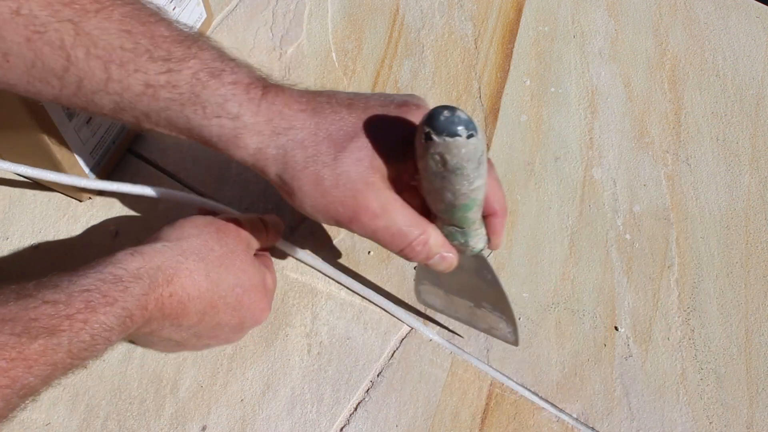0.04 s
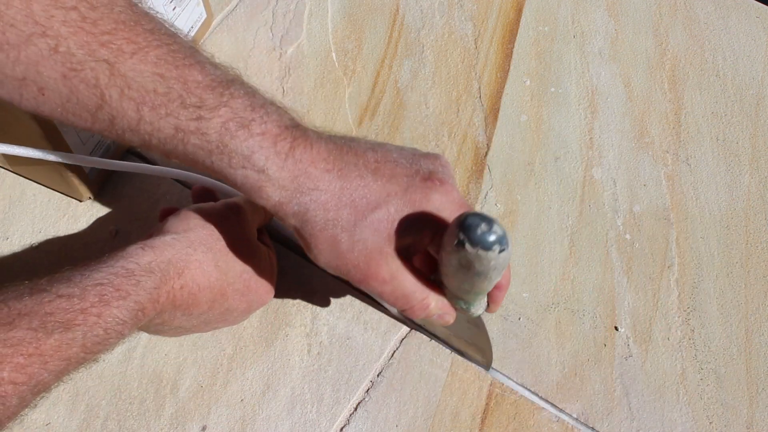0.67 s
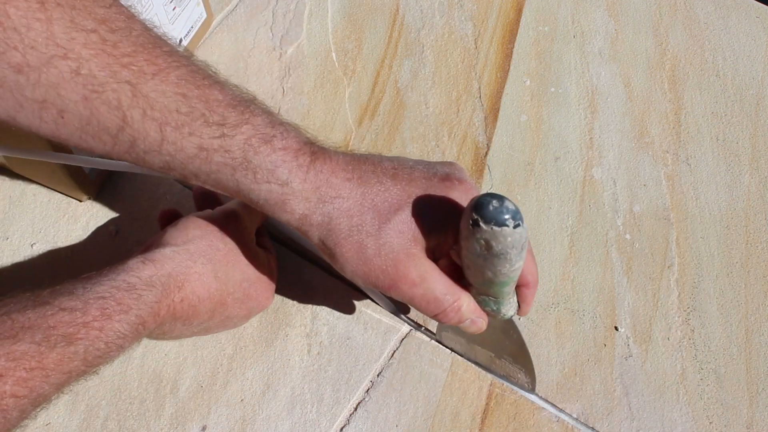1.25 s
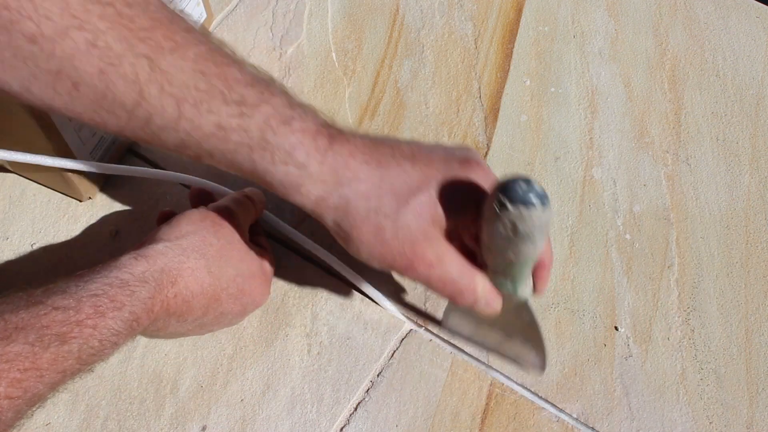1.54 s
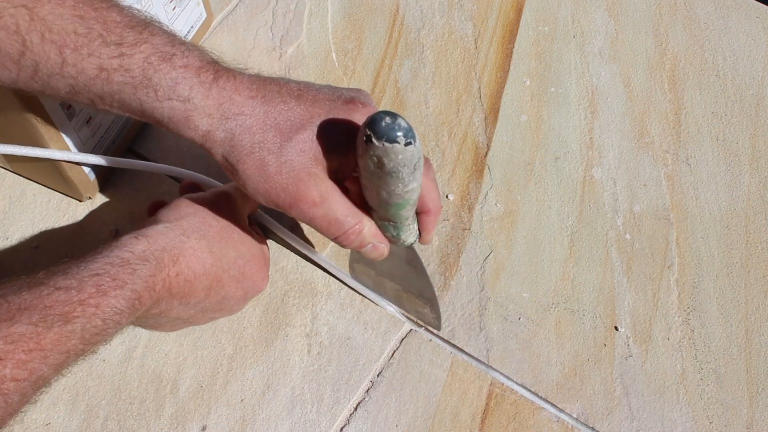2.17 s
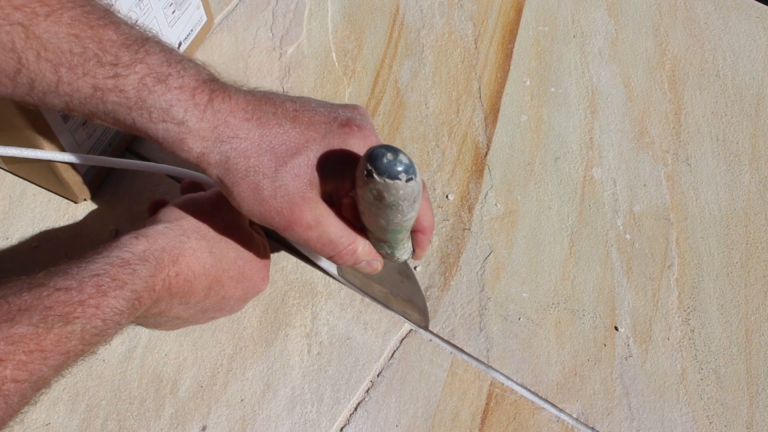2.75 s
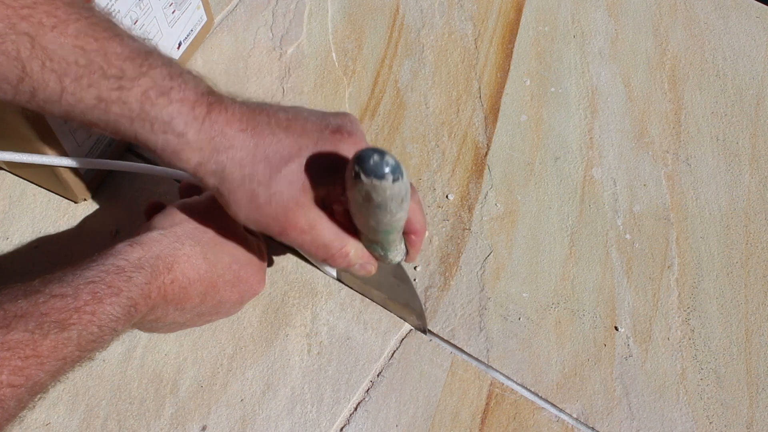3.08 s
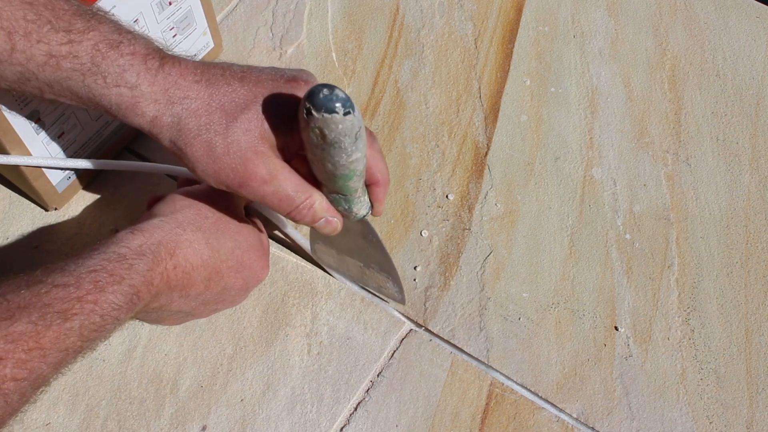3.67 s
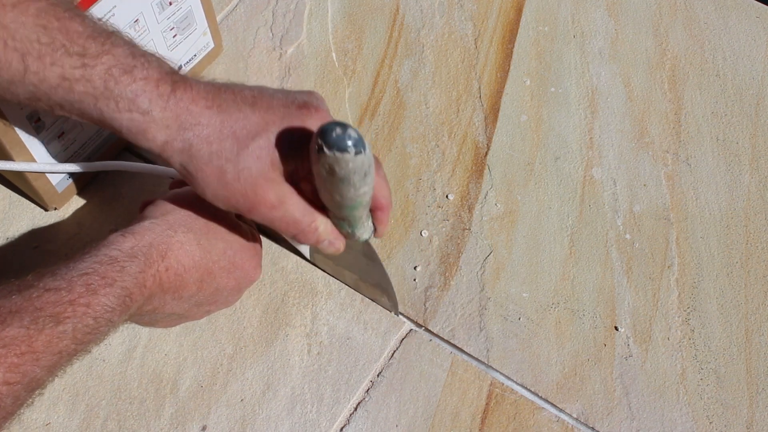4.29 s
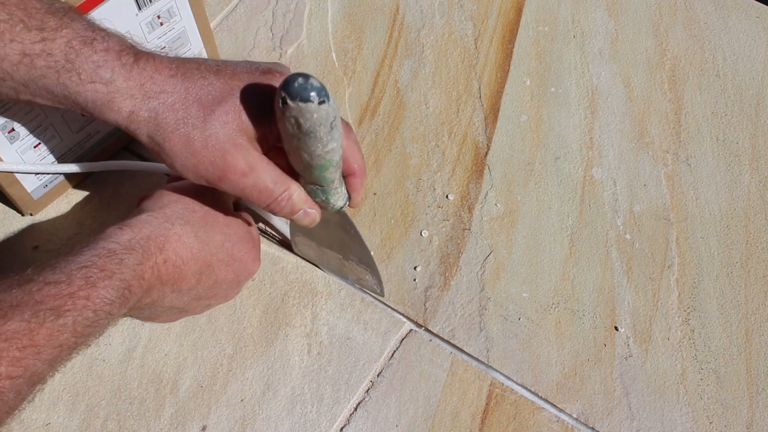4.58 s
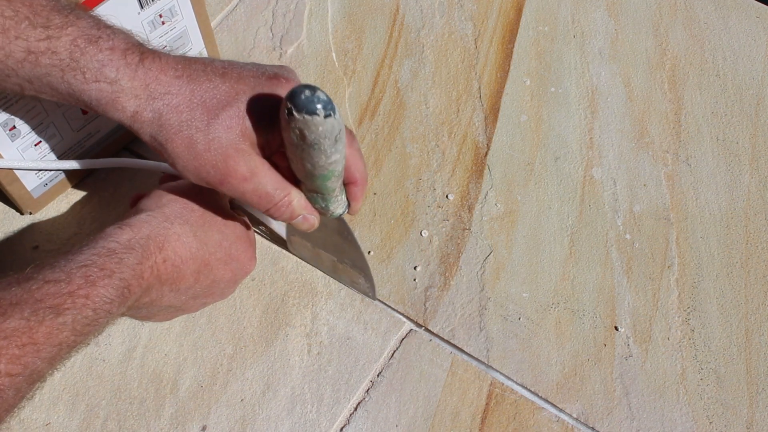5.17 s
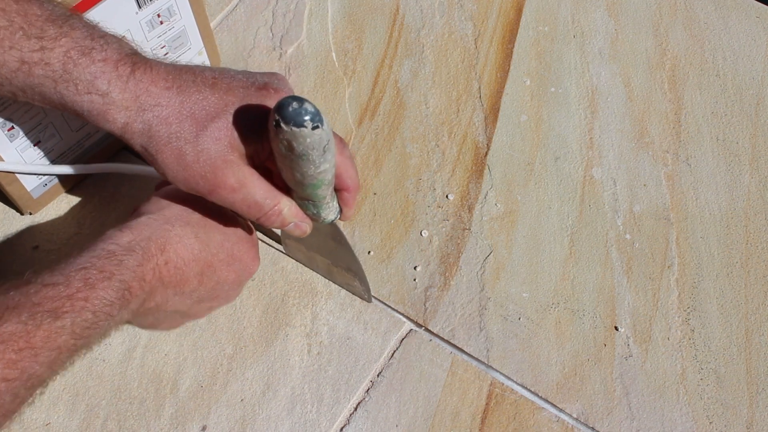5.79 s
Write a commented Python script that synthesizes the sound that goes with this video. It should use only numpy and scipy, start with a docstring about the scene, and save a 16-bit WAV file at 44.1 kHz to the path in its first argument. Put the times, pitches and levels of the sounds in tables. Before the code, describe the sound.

Outdoors, distant traffic rumbles steadily under a soft tyre wash that eases over the first two seconds. A dove gives one rolling coo at the start. From 0.6 seconds, close by, a steel scraper works foam rod into a paving joint with short gritty scrapes and light clicks. Sharper clicks with a brief metallic ring come at about 1.0 and 1.6 seconds, followed by softer rubbing. A far bird whistles very faintly around 1.1 seconds and several times between 2.5 and 3.9. A busy run of clicks, scrapes and slight foam creaks fills 3.0 to 3.7 seconds, and another, with a bright ping, comes from 4.2 to 4.7. The dove coos six times, short and long, from 3.7 to 5.6 seconds. After a click at 5.3, the tool knocks hard on the slab at 5.8, the loudest sound, followed by a small ringing click.

```python
"""Outdoors on sandstone paving, close by, a steel scraper presses foam rod into a joint between slabs.
The blade rubs over grit, clicks against the stone edges, rings as it springs free and knocks once, hard.
A dove coos, its fluttering throat chopping the tone into a roll. A far bird whistles thinly,
and distant traffic rumbles under a wash of tyre noise."""
import sys
import numpy as np
from scipy import signal
from scipy.fft import rfft, irfft
from scipy.io import wavfile
from scipy.ndimage import uniform_filter1d

SR = 44100
rng = np.random.default_rng(int(sys.argv[2]) if len(sys.argv) > 2 else 0)


def bounce(signal):
    """Save signal as a 16-bit WAV file at the path given by the first command-line argument."""
    frames = np.transpose(np.atleast_2d(signal))
    limited = np.clip(frames, -1, 1)
    pcm = np.round(limited * 32767).astype(np.int16)
    wavfile.write(sys.argv[1], SR, pcm)


N = 266408
T = np.arange(N) / SR

# scraper strokes along the joint: peak_s, length_s, level_db, foam_db (added to level_db), singing_hz
STROKES = [(.629, 0.013, -48.5, -23, 7600), (0.673, .005, -45, -20, 11500),
           (0.798, 0.083, -39.5, -12.5, 1290), (0.828, 0.019, -32.5, -13, 4240),
           (.886, .06, -44, -13.5, 4020), (0.929, 0.019, -45.5, -10, 10000), (1.002, .03, -45, -24, 7100),
           (1.026, 0.033, -30, -30, 7200), (1.502, 0.052, -50.5, -8.5, 8100),
           (1.654, .016, -31.5, -25, 7450), (2.084, 0.074, -52, -13, 4100),
           (2.196, 0.044, -49, -11.5, 4460), (2.377, 0.12, -48, -11, 9100),
           (2.582, 0.021, -45.5, -12, 3870), (2.993, 0.081, -53.5, 6, 5640), (3.102, 0.033, -42, -11, 9250),
           (3.161, 0.0098, -46.5, -10.5, 6400), (3.248, .036, -32.5, -26, 6500),
           (3.308, .044, -36, -13.5, 940), (3.358, 0.036, -43.5, -10.5, 10800),
           (3.436, .022, -37.5, 6.5, 1720), (3.476, 0.025, -37.5, 2.5, 2430), (3.703, 0.16, -53, -11, 7900),
           (4.266, 0.061, -39, -11, 9650), (4.431, 0.046, -36.5, -11.5, 9400), (4.609, 0.078, -49, 4, 5500),
           (4.89, 0.017, -50, -9.5, 6000), (5.89, 0.064, -52, -12, 3500), (5.994, 0.044, -46.5, 1, 2270)]
# the tones the steel blade rings with: pitch_hz, level_db, ring_s (time to fade by 60 dB)
BLADE_TONES = [(942, -8, .1), (1906, -1, .1), (2299, -14, .17), (3090, -6, .07), (3768, -9, .22),
               (4339, -16, .13), (5461, 0, .11), (7009, -7, .11), (7250, -10, .06), (7455, -5, .11),
               (8382, -11, .07), (9238, -13, .07), (10260, -7, .07), (11910, -14, .06), (12920, -14, .07),
               (14200, -18, .06)]


def rubs(steel_db=-9, singing_db=8, push_share=0.43):
    """Steel drags over sand; each stroke makes another part of the blade sing; squeezed foam creaks."""
    # tone colour of the sand: pitch_hz, level_db
    grit_colour = [(500, -25.5), (900, 10), (1400, -3), (2100, 3), (3200, 3), (4300, 3.5), (6500, 8),
                   (8800, 11), (11000, 12.5), (13000, 0), (16000, -52)]
    # tone colour of the foam: pitch_hz, level_db
    foam_colour = [(70, -11), (160, 8.5), (330, -6), (500, -7), (750, -17), (1500, 5.5), (3000, -23),
                   (5000, -3)]
    out = np.zeros(N)
    t = np.linspace(-.2, .2, int(.4 * SR))
    # pressed into the joint, the blade rings only briefly
    pressed = ring([(hz, db, .15 * ring_s) for hz, db, ring_s in BLADE_TONES], 0, count=2000)
    for peak_s, length_s, db, foam_db, singing_hz in STROKES:
        rise_s, fall_s = length_s * push_share, length_s * (1 - push_share)
        pressure = np.exp(-np.abs(t / np.where(t < 0, rise_s, fall_s)) ** 1.18)
        judder = undb(3 * wobble(len(t), 180))
        sand = grains(len(t), 4.2) * judder
        # the more foam under the edge, the duller the grit
        dull_db = 3.42 * max(foam_db + 14.5, 0)
        dulled = [(hz, grit_db - dull_db * max(np.log2(hz / 4000), 0)) for hz, grit_db in grit_colour]
        steel = unit(signal.fftconvolve(sand, pressed)[:len(t)])
        grit = unit(colour(sand, dulled)) + undb(steel_db - dull_db) * steel
        singing = signal.lfilter(*signal.iirpeak(singing_hz, 4, fs=SR), grit)
        singing *= np.sqrt(3000 / singing_hz)  # the blade's low tones stand out most
        scrape = unit(grit + undb(singing_db) * singing)
        foam = unit(colour(grains(len(t), 5.8) * judder, foam_colour))
        add(out, peak_s + t[0], undb(db) * pressure * (scrape + undb(foam_db) * foam))
    return pan(out, 2.1)


def clicks():
    """The blade catches on stone: a square hit snaps and thumps the slab, a glancing one skids."""
    # blade meeting stone: start_s, level_db, squareness (0 glancing, 1 head-on), clack_hz
    hits = [(0.7461, -38.5, 0.3, 1090), (0.7952, -36.5, 0.11, 7560), (0.8224, -35.5, 0.23, 2200),
            (1.034, -21, 0, 7200), (1.038, -23.5, 0.079, 7300), (1.639, -24.5, 0.24, 7300),
            (1.6596, -26.5, .3, 2880), (2.0956, -32.5, 0.75, 9700), (2.3354, -38.5, 0.68, 9650),
            (2.3834, -33, 0.61, 10100), (3.065, -36, 0.48, 1100), (3.095, -35.5, 0.29, 3160),
            (3.2133, -35.5, .15, 6470), (3.2367, -27.5, 0.032, 5350), (3.244, -22.5, 0, 12900),
            (3.2742, -32.5, 0.39, 13000), (3.284, -27.5, 0.1, 10100), (3.3171, -27.5, .25, 5600),
            (3.342, -34, 0.69, 3130), (3.356, -41, 0.73, 3120), (3.4195, -41.5, 1, 1110),
            (3.4269, -37.5, 0.93, 1400), (3.4334, -28.5, 0.84, 1900), (3.4624, -33, 0.91, 1900),
            (3.4891, -28.5, 0.72, 4160), (3.51, -36, 0.92, 4400), (3.55, -31, 0.75, 2950),
            (3.607, -39, 0.81, 10100), (3.6408, -36, 0.28, 7300), (3.6815, -42, 0.23, 12000),
            (4.2344, -32, 0, 10000), (4.2845, -26.5, 0.2, 12600), (4.4078, -24, 0.31, 3170),
            (4.4374, -22, 0.13, 7250), (4.4476, -20.5, 0.28, 10300), (4.524, -27, 0.81, 1360),
            (4.602, -33.5, 0.3, 5400), (4.622, -36, 0.9, 10000), (4.681, -40.5, 0.74, 1860),
            (5.275, -35.5, 0.66, 3130), (5.307, -24.5, 0.52, 8950), (5.909, -39, 0.65, 1220),
            (5.9742, -29, 0.46, 1040)]
    # tone colours of a click's four parts, low to high: pitch_hz, level_db
    thump = [(80, -16.5), (200, -9.5), (380, -4), (520, -5.5), (800, -17.5), (1200, -13), (2500, -17.5)]
    middle = [(400, -63), (950, 8.5), (1900, 5), (3200, 1.5), (4800, -1.5)]
    treble = [(1800, -21.5), (3700, 7.5), (5500, 11), (7300, 9.5), (8800, 8.5), (11500, -19)]
    top = [(6000, -35), (9300, 0), (10500, 0), (12800, -2), (14000, -9), (16000, -12)]
    out = np.zeros((2, N))
    for start_s, db, square, clack_hz in hits + stray_grains():
        # each pair given to between() is (glancing, square)
        slip_s = between((0.0032, 0.00076), square)
        rise_s = .0001 + 0.0013 * (1 - square) ** 2
        snap = 1.5 * square
        click = undb(between((-31, 8), square)) * crunch(thump, 0.0052, 0.89)
        click += undb(between((-18, -1), square)) * crunch(middle, slip_s, 1.5 * snap, rise_s)
        click += undb(-3.5) * crunch(treble, slip_s, snap, rise_s)
        click += undb(between((-2.5, -15.5), square)) * crunch(top, slip_s, 0.3 * snap, rise_s)
        # each contact point clacks at its own pitch
        clack = [(clack_hz / np.sqrt(2), -9), (clack_hz, 0), (clack_hz * np.sqrt(2), -9)]
        click += undb(-5) * crunch(clack, slip_s, snap, rise_s)
        add(out, start_s - 0.0006 * (1 - square), pan(click * undb(db), between((1.5, 5.5), square)))
    return out


def stray_grains(count=2, firm_db=-45, squareness=.3):
    """List extra clicks: firm strokes catch stray grains, hardest near peak pressure; light ones glide."""
    chance = rng.standard_normal((len(STROKES), count, 2))
    hits = []
    for (peak_s, length_s, db, _, hz), draws in zip(STROKES, chance):
        if db > firm_db:
            for offset, size in draws:
                grain_db = db - 3 - 8 * abs(offset) + 2 * size
                hits.append((peak_s + length_s * offset / 2, grain_db, squareness, hz))
    return hits


def blade():
    """The thin steel rings once the joint no longer holds it; the contact point favours some tones."""
    # blade springing free: start_s, level_db, tilt_db (per octave), favoured_hz, boost_db
    releases = [(1.039, -26, .3, 5461, 3), (1.640, -37, 2, 7300, 7), (1.659, -28.5, -1.2, 7455, 3),
                (3.247, -40, 2, 12920, 4), (4.448, -31, 2, 12920, 13), (5.974, -29.5, -2, 3770, 15)]
    out = np.zeros(N)
    for start_s, db, tilt_db, favoured_hz, boost_db in releases:
        tones = [(hz, tone_db + boost_db * np.exp(-(np.log2(hz / favoured_hz) / 0.05) ** 2), ring_s)
                 for hz, tone_db, ring_s in BLADE_TONES]
        add(out, start_s, undb(db) * ring(tones, tilt_db))
    return pan(out, 1.2)


def knock(start_s=5.837):
    """The tool butts hard on the slab, its handle rings, and the paving throws the crack back."""
    # tone colour of the crack: pitch_hz, level_db
    crack_colour = [(150, -28), (250, -9), (350, 0.5), (500, -6), (700, 0), (1100, -4), (1800, 0),
                    (2300, -8), (4000, -7), (4900, -15), (6500, -26), (11000, -21.5), (16000, -41)]
    # the tones the handle rings with: pitch_hz, level_db, ring_s
    handle_tones = [(353, -17, 0.062), (800, -13, 0.12), (892, 13, 0.049), (1890, 4, 0.036),
                    (2730, -17, 0.033), (5280, 3, 0.034), (6370, -6, 0.075), (7060, -5, 0.067),
                    (8420, -11, .09)]
    out = np.zeros(N)
    crack = crunch(crack_colour, .0025, 1.8)
    add(out, start_s, undb(-14.0) * crack)
    add(out, start_s + 0.0006, undb(-22.5) * ring(handle_tones, 0))
    add(out, start_s + 0.0029, undb(-23.5) * crack)
    return pan(out, 2.0)


def dove(roll_hz=67, bend_hz=30, waver_hz=52, lowest_hz=518):
    """An almost pure tone climbs and sags; a flutter in the throat chops it into uneven pulses."""
    # coos: start_s, length_s, climb_s, peak_hz, level_db, roll_before and roll_after the peak (0 to 1)
    coos = [(.035, .497, 0.33, 711.3, -35.5, 0.8, 0), (3.733, 0.071, 0.045, 686, -36.5, 0.5, 0.3),
            (3.938, 0.11, 0.076, 648.5, -36.5, 0.49, 0.9), (4.152, 0.53, 0.33, 715, -35.5, 0.81, .1),
            (4.754, 0.087, 0.034, 693, -42.5, 0.1, 0.13), (4.94, .148, 0.084, 760, -38.5, 0.4, 0.5),
            (5.176, 0.43, 0.13, 751, -38.5, 0.5, 0.56)]
    out = np.zeros((2, N))
    for start_s, length_s, climb_s, peak_hz, level_db, roll_before, roll_after in coos:
        t = T[:int(length_s * SR)]
        remaining_s = length_s - t
        before_s, after_s = np.maximum(climb_s - t, 0), np.maximum(t - climb_s, 0)
        arch_hz = peak_hz - 420 * before_s - 480 * after_s
        # the pitch slides up into each coo and drops out of it
        slide_hz = 148.7 * np.exp(-t / 0.02007) + 151 * np.exp(-remaining_s / .011)
        hz = np.maximum(arch_hz - slide_hz, lowest_hz)
        roll = between((roll_before, roll_after), (1 + np.tanh((t - climb_s) / .04)) / 2)
        db = level_db - 17 * before_s - 19 * after_s - 2.5 * roll
        unsteady, waver, strength = (unit(uniform_filter1d(wobble(SR, 300), 150))[:len(t)]
                                     for _ in range(3))
        flutter = 2 * np.pi * np.cumsum(roll_hz * (1 + .24 * unsteady)) / SR
        pulses = (1 + 1.05 * roll * np.cos(flutter)) / np.sqrt(1 + .7 * roll ** 2)
        pulses *= undb(2.2 * roll * strength)
        pitch_hz = hz + roll * (bend_hz * np.sin(flutter) + waver_hz * waver)
        phase = 2 * np.pi * np.cumsum(pitch_hz) / SR
        fade = np.minimum(np.minimum(t / .028, remaining_s / .011), 1)
        # the held tone sits to the right; the roll spreads evenly
        right_db = 7.5 - 7 * roll
        voice = np.array([undb(-right_db / 2) * np.sin(phase - .55), undb(right_db / 2) * np.sin(phase)])
        add(out, start_s, voice * pulses * fade * undb(db))
    return out + echoes(out.mean(axis=0), .4, -9, [(200, 0), (16000, 0)])


def far_bird(sag_hz_per_s=260):
    """Thin, slightly falling whistles fade in and out from a long way off."""
    # the bird's calls: start_s, length_s, start_hz, level_db
    whistles = [(1.108, .15, 2690, -61), (2.55, 0.1, 2790, -62), (2.872, 0.11, 2670, -56.5),
                (3.07, 0.21, 2650, -64), (3.592, 0.27, 2730, -66)]
    out = np.zeros(N)
    for start_s, length_s, start_hz, db in whistles:
        progress = np.linspace(0, 1, int(length_s * SR))
        waver, flicker = (wobble(len(progress), 500) for _ in range(2))
        hz = start_hz - sag_hz_per_s * length_s * progress + 22 * waver
        swell = np.sqrt(progress * (1 - progress)) * undb(3.5 * flicker)
        add(out, start_s, undb(db) * unit(swell * np.sin(2 * np.pi * np.cumsum(hz) / SR)))
    return out + echoes(out, 0.53, -35, [(200, 0), (16000, 0)])


def traffic(level_db=-47):
    """A far rumble, alike on both sides, lies under a steady hiss and a wide tyre wash that recedes."""
    # tone colour of the distant noise: pitch_hz, level_db
    noise_colour = [(12, -37), (20, -17), (86, 0.5), (228, -13), (357, -20.5), (485, -16.5), (527, -17.5),
                    (849, -17), (1220, -22.5), (1910, -25.5), (2390, -29), (2670, -27.5), (2910, -28.5),
                    (14700, -37), (16000, -40)]
    # how the traffic swells and fades: time_s, rumble_db, wash_db
    swells = [(0, 1, 5.5), (.8, 3, 3), (2.1, 1.66, -0.5), (6.04, 0, -1.4)]
    time_s, *columns = np.transpose(swells)
    rumble_db, wash_db = (np.interp(T, time_s, column) for column in columns)
    hz = np.arange(N // 2 + 1) * SR / N
    shape = undb(spectrum_db(noise_colour, hz))
    # how much left and right differ: pitch_hz, width_db
    widths = [(60, -15), (120, -6.0), (250, -2.5), (700, -5.0), (1500, -2), (8000, -1), (15000, 0.5)]
    width = undb(spectrum_db(widths, hz))
    centre, side = rfft(rng.standard_normal((2, N)))
    air = np.array([centre + width * side, centre - width * side]) * unit(shape)
    low = 1 / (1 + (hz / 350) ** 2)
    high = 1 / (1 + (6500 / (hz + 1)) ** 3)
    rumble = pan(irfft(air * low, N), -0.88) * undb(rumble_db)
    wash = irfft(air * (1 - low - high), N) * undb(wash_db)
    hiss = irfft(air * high, N)
    return undb(level_db) * (rumble + wash + hiss)


def crunch(points, decay_s, snap, rise_s=1e-5, count=3000):
    """One sharp break and a fast-dying spray of grit behind it."""
    t = T[:count]
    spray = grains(count, 3.3) * np.exp(-t / decay_s) * (1 - np.exp(-t / rise_s))
    spray /= np.linalg.norm(spray)
    spray[0] += snap
    return blow(colour(spray, points))


def grains(count, spread_db):
    """A crowd of tiny hits of very uneven size."""
    return rng.standard_normal(count) * undb(spread_db * np.minimum(rng.exponential(size=count), 6))


def ring(tones, tilt_db, count=16000):
    """Tones that die away after one blow."""
    t = T[:count]
    return blow(sum(undb(db + tilt_db * np.log2(hz / 1000) - 60 * t / ring_s) * np.sin(2 * np.pi * hz * t)
                    for hz, db, ring_s in tones))


def echoes(x, ring_s, db, points):
    """Scattered reflections, different at each side."""
    t = T[:SR // 2]
    fade = undb(-60 * t / ring_s) * (1 - np.exp(-20 * t / ring_s))
    tails = [colour(rng.standard_normal(len(t)) * fade, points) for _ in range(2)]
    return undb(db) * np.array([signal.fftconvolve(x, tail / np.linalg.norm(tail))[:N] for tail in tails])


def colour(x, points, size=2048):
    """Filter x to follow (pitch_hz, level_db) points, falling away beyond their ends."""
    hz = np.arange(size // 2 + 1) * SR / size + 1
    octaves_outside = np.maximum(0, np.maximum(np.log2(points[0][0] / hz), np.log2(hz / points[-1][0])))
    cepstrum = irfft(np.log(undb(spectrum_db(points, hz) - 10 * octaves_outside)))
    # fold the filter forward in time, so nothing sounds before the hit
    cepstrum[1:size // 2] *= 2
    cepstrum[size // 2 + 1:] = 0
    return signal.fftconvolve(x, irfft(np.exp(rfft(cepstrum))))[:len(x)]


def spectrum_db(points, hz):
    """Read the level at hz from (pitch_hz, level_db) points, blending by octaves."""
    pitch_hz, level_db = np.transpose(points)
    return np.interp(np.log(hz + 1e-3), np.log(pitch_hz), level_db)


def wobble(count, smooth_samples):
    """A smoothed random wobble of strength 1."""
    return unit(uniform_filter1d(rng.standard_normal(count), smooth_samples))


def undb(db):
    """Turn decibels into a gain."""
    return 10 ** (np.asarray(db) / 20)


def unit(x):
    """Scale to an average strength (rms) of 1."""
    return x / np.sqrt(np.mean(x ** 2))


def blow(x):
    """Scale a short sound to the energy of 3 ms at strength 1."""
    return x * np.sqrt(.003 * SR / np.sum(x ** 2))


def between(ends, share):
    """Blend from the first value to the second."""
    return ends[0] + share * (ends[1] - ends[0])


def pan(x, db):
    """Place a sound by its left minus right level."""
    return undb(np.array([[db], [-db]]) / 2) * x


def add(out, start_s, x):
    """Mix x into out from start_s on."""
    i = max(int(start_s * SR), 0)
    out[..., i:i + x.shape[-1]] += x[..., :N - i]


def scene():
    """Tool sounds bounce off the paving, the kneeling worker and the walls; birds and traffic join in."""
    tool = clicks() + rubs() + blade() + knock()
    near = echoes(tool.mean(axis=0), 0.019, -4, [(200, 4.5), (2000, -13.5), (8000, -7), (14000, -0.5)])
    walls = echoes(tool.mean(axis=0), 0.38, -21.0, [(200, -29), (2000, -8), (7000, -11.5), (15000, -15)])
    return tool + near + walls + dove() + far_bird() + traffic()


def record(dry):
    """Cut the treble above 16000 Hz."""
    return signal.sosfilt(signal.ellip(10, .2, 80, 16000, fs=SR, output="sos"), dry)


dry = scene()
out = record(dry)
bounce(out)
```